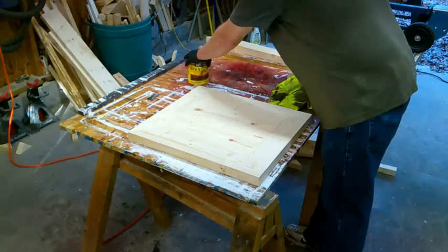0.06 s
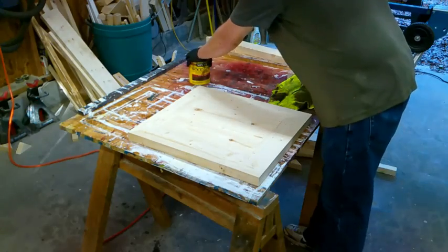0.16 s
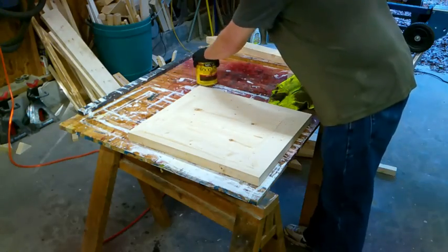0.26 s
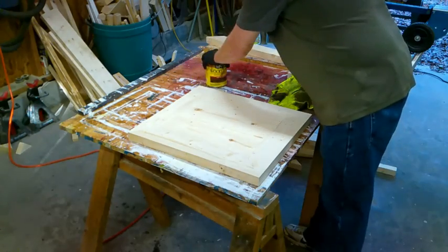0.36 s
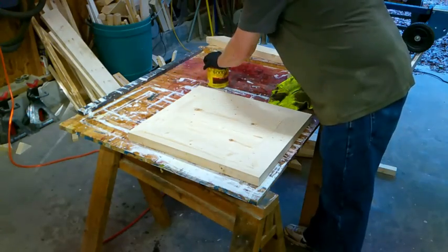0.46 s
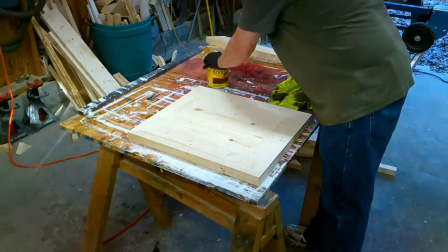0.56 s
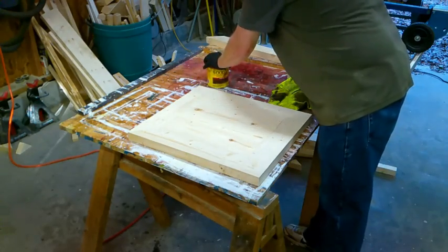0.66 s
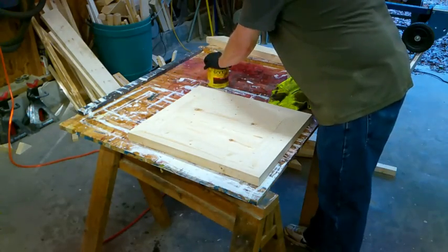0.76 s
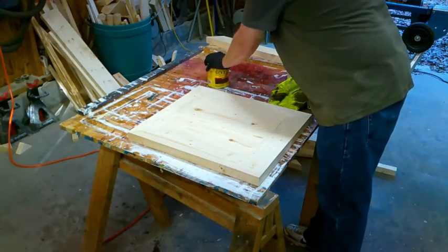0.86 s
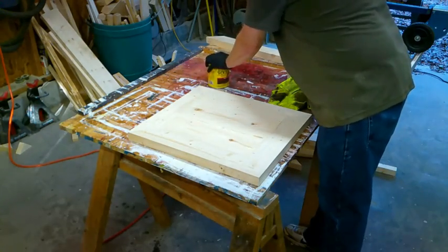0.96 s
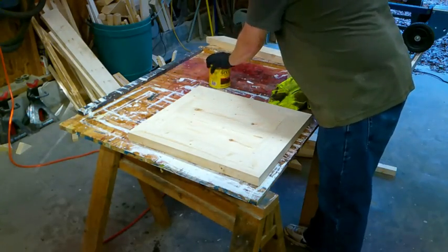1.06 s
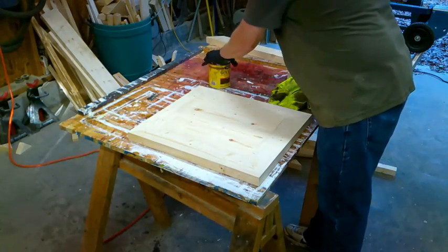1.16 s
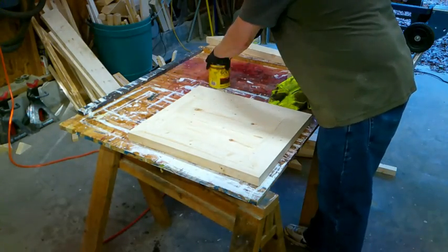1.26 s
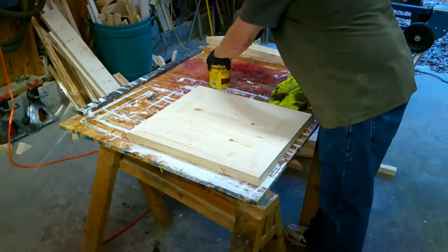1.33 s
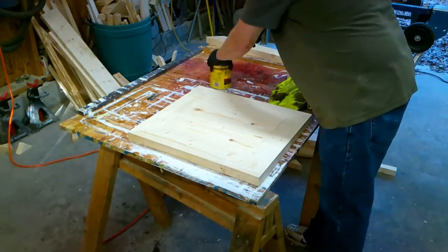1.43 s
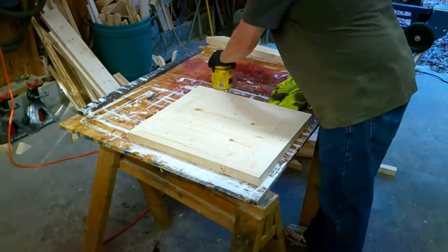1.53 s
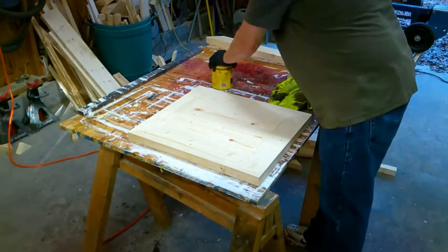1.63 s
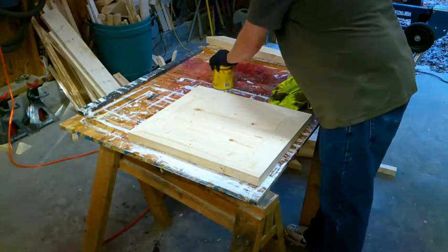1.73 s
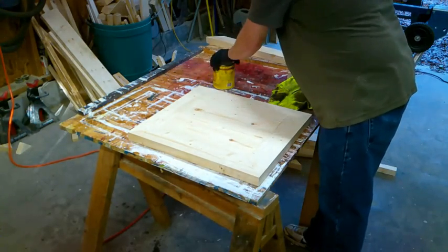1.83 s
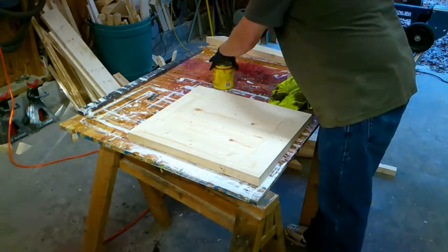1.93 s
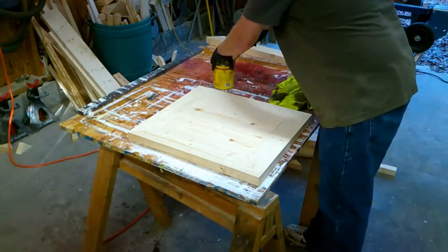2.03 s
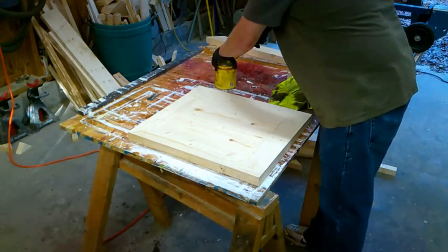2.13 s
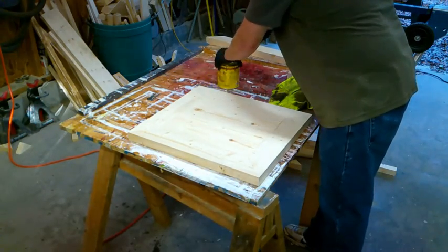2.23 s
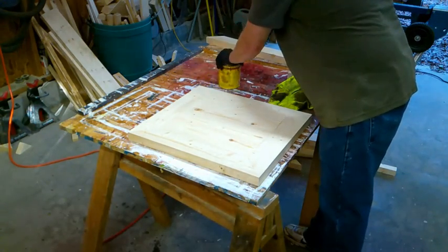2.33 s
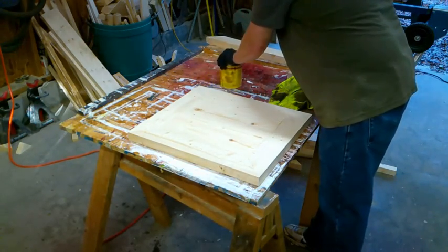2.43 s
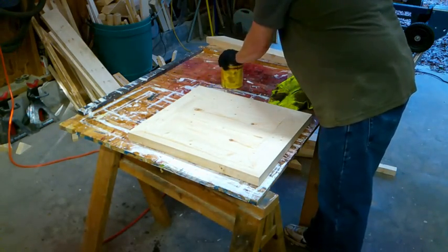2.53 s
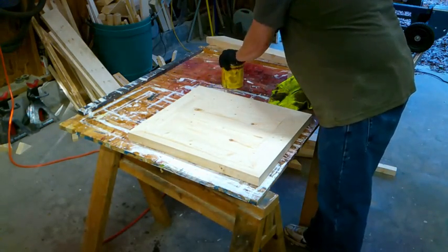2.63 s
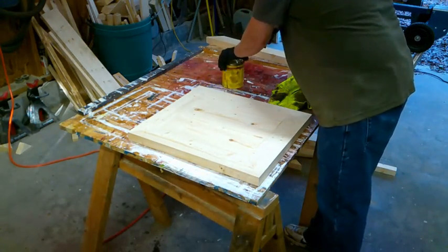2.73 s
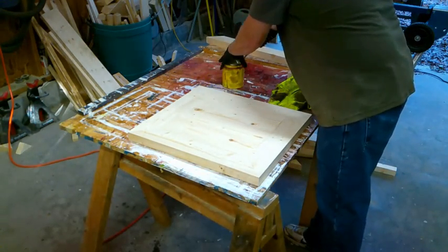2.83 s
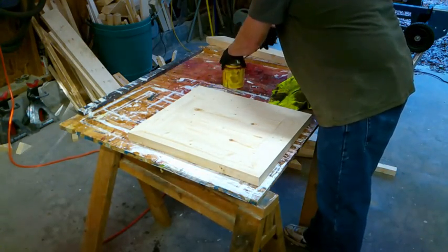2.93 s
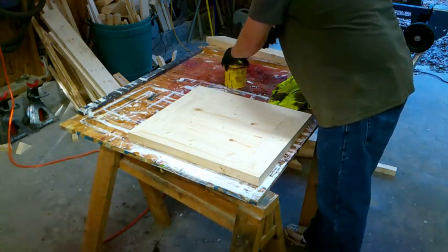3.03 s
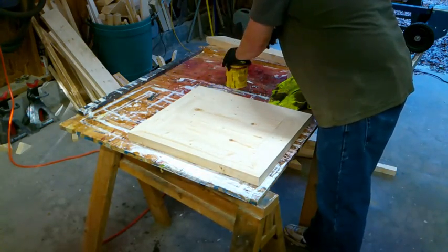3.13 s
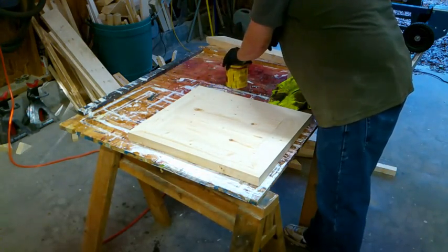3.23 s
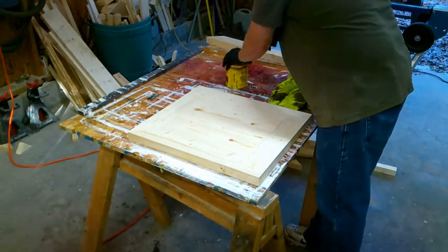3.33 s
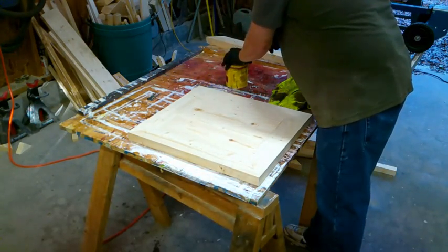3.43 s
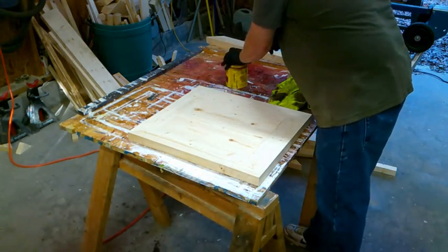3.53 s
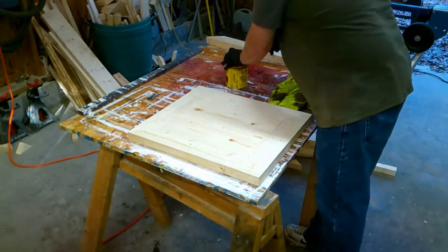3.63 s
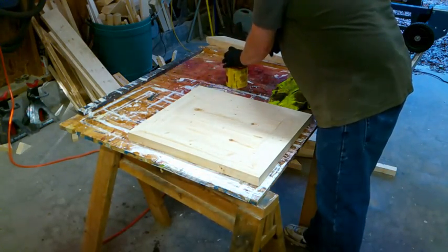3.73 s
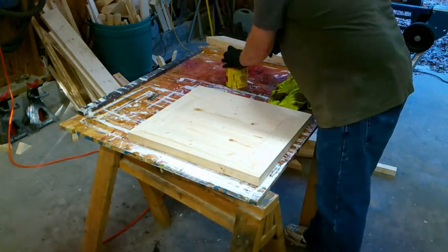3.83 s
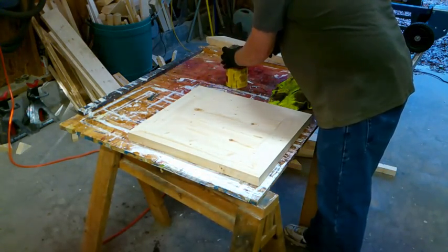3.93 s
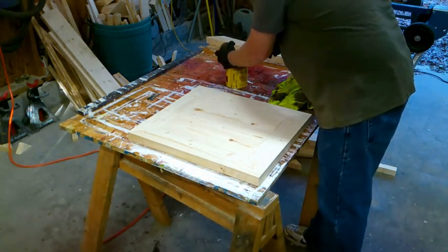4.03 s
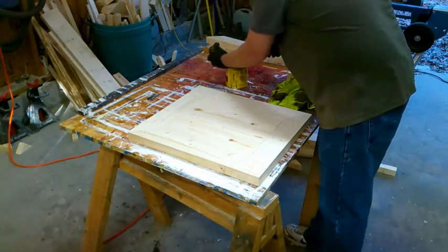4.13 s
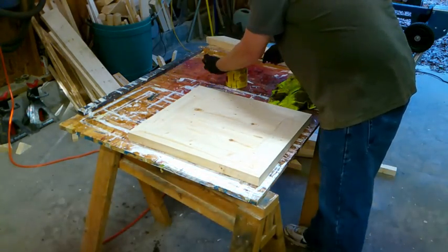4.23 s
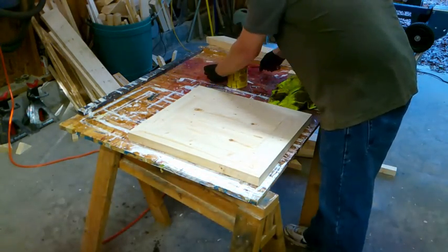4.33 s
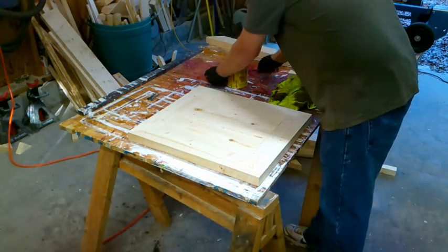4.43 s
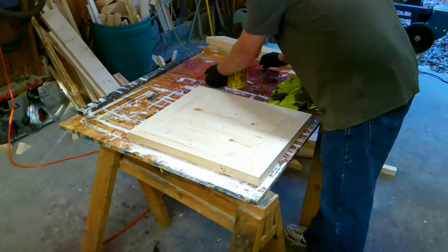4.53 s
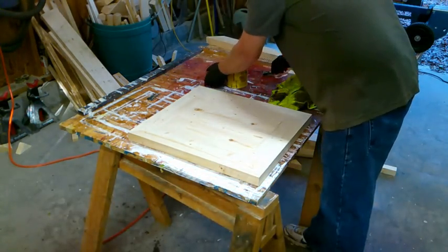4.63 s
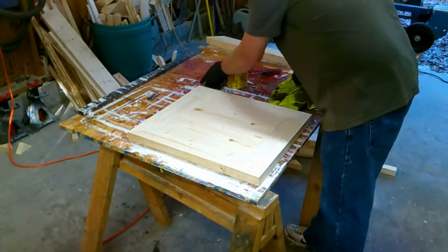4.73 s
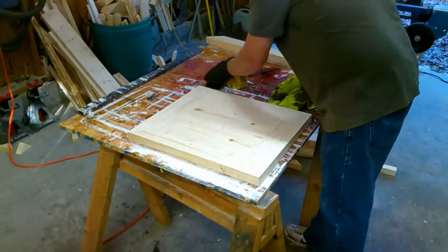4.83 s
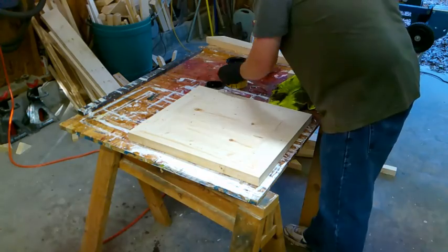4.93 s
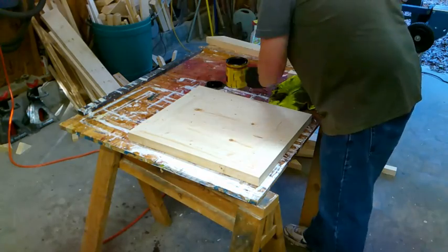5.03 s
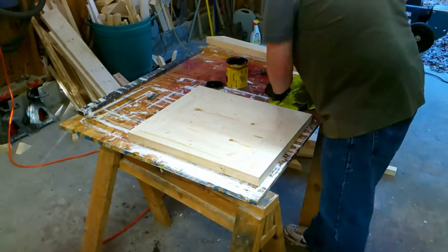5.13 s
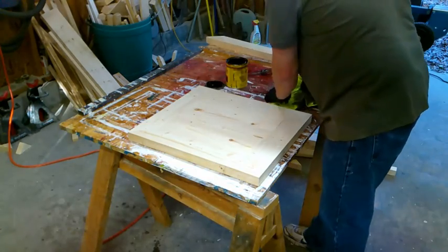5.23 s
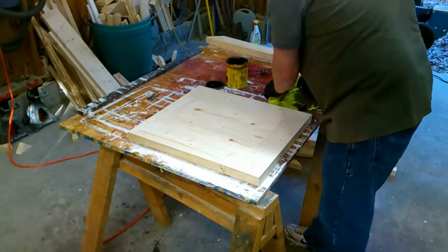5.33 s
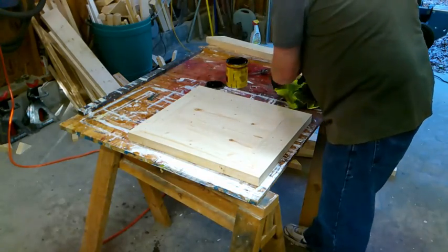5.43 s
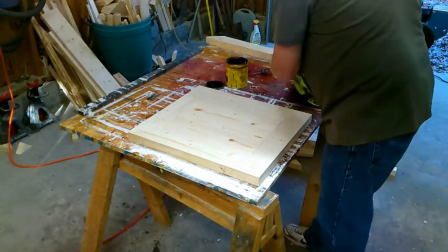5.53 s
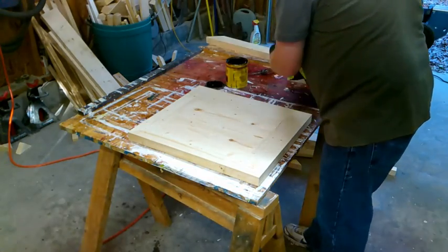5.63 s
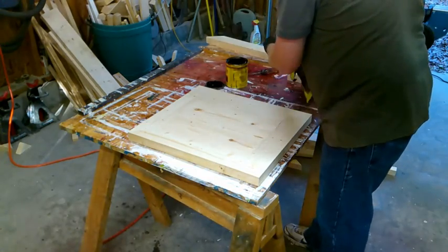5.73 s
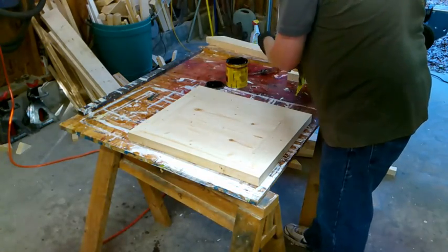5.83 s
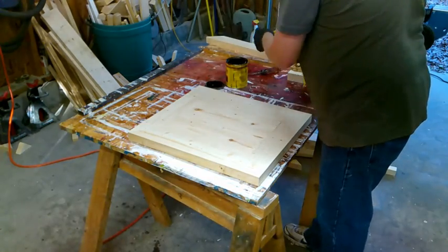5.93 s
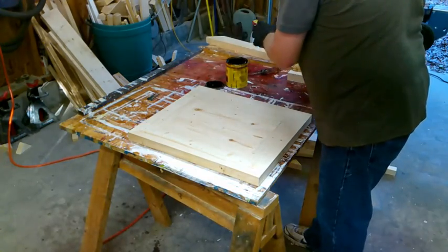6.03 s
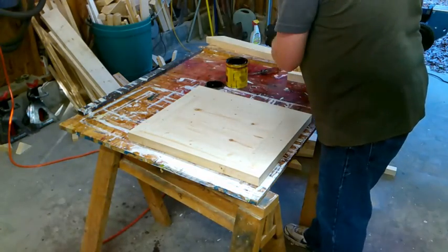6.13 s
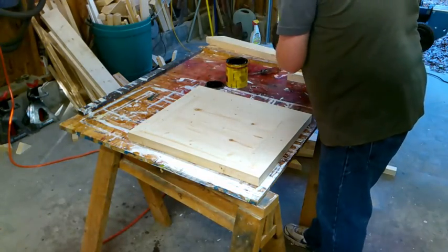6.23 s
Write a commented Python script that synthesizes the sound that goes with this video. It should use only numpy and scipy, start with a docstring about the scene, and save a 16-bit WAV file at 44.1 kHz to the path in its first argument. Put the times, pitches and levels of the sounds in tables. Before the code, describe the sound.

Light tinny knocks and gritty scrapes of a can on wood in a hard garage, ending with a dropped tool's loud clatter and short skid.

```python
"""Paint can opened on a workshop bench

A small paint can is turned, knocked and pried open on plywood; then a steel tool drops and skids.
Blows are bursts of contact noise that ring damped modes of bench, can and tool shaft.
Scuffs and the skid are dense grit noise, and little ticks are short bright bursts.
The hard garage answers for about half a second over mains hum and a faint hiss."""
import sys
import numpy as np
from scipy import signal
from scipy.fft import rfft, irfft
from scipy.io import wavfile
from scipy.ndimage import uniform_filter1d

SR = 44100
rng = np.random.default_rng(int(sys.argv[2]) if len(sys.argv) > 2 else 0)


def put_to_file(sound):
    """Save the sound as 16-bit audio at rate SR, in the file named by the first command-line argument."""
    columns = np.atleast_2d(sound).T  # one column per channel
    safe = np.clip(columns, -1, 1)
    whole_steps = np.round(safe * 32767)
    wavfile.write(sys.argv[1], SR, whole_steps.astype(np.int16))


N = 276066
T = np.arange(N) / SR  # seconds

# All levels stand ahead of the soft saturation in record().
# Mains hum partials. Each row: frequency in Hz, starting level in dB rms.
HUM_PARTIALS = [(59.6, -55), (119.5, -69.5), (179, -60), (300, -73.5)]
# Colour of the hiss. Each row: frequency in Hz, relative spectral level in dB.
HISS_COLOUR = [(24, -5.5), (40, -23), (77, -14.5), (114, -7.5), (179, -16), (230, -15.5), (710, -20),
               (12300, -35.5), (15800, -34.5)]
# Room decay by band. Each row: band in Hz, t60 in seconds, level in dB against the direct sound.
ROOM_BANDS = [(313, 0.63, -4.5), (857, 0.6, 1.5), (3190, 0.41, -2.5), (8640, 0.31, -3.5)]
# Damped bodies: t60 in seconds, then the modes. Each row: nominal frequency in Hz, relative level in dB.
BENCH_BODY = 0.11, [(150, -11.5), (185, -5.5), (232, -1), (298, 1), (340, -3), (377, -3), (435, -2.5),
              (468, -5), (520, -2.5), (617, -3.5), (690, -7.5)]  # plywood top
WALL_BODY = 0.033, [(770, 6.5), (925, 5.5), (1050, 4.5), (1200, -1), (1330, 7.5), (1490, 1), (1600, 0.5),
             (1840, 1)]  # side of the can, damped by glove and paint
RIM_BODY = 0.021, [(2310, 2), (2560, 8.5), (2840, 3.5), (3100, 4.5), (3380, 0.5), (4170, 5), (4300, -25),
            (4710, 3), (5100, -46), (5820, -1), (6720, -11), (8360, -10.5)]  # rim of the can
SHAFT_BODY = 0.044, [(1950, -20.5), (2280, 6.5), (2750, -12), (3350, -13.5), (4680, -21), (5700, -20.5),
              (6840, -22), (9800, -16.5)]  # shaft of the steel tool
# Bright little ticks of grit or glove. Each row: start in seconds, level in dB.
GRIT_TICKS = [(0.64, -43.5), (.888, -62), (3.386, -51.5), (2.419, -58), (3.514, -76), (5.158, -59),
              (5.205, -55)]
# Can and gloves rub the bench. Each row: middle in seconds, length in seconds, peak bench level in dB,
# peak metal level in dB.
BENCH_SCUFFS = [(0.293, 0.42, -34.5, -52), (0.36, 0.36, -39, -81), (0.71, 0.21, -53, -54),
                (0.923, 0.066, -34, -49), (1.083, 0.21, -38, -52.5), (1.315, 0.039, -35.5, -41),
                (1.878, 0.12, -44.5, -52), (2.074, 0.082, -39.5, -61), (2.437, 0.034, -53, -53),
                (2.522, 0.37, -37, -47.5), (2.754, 0.1, -40, -47), (3.31, 0.27, -36.5, -48),
                (3.775, 0.22, -44, -61), (3.892, 0.043, -44, -55), (4.232, 0.092, -62, -57.5),
                (4.386, 0.29, -58, -56.5)]
# The tool lands and bounces against bench and can. Each row: start in seconds, bench level in dB,
# can wall level in dB, favoured pitch in Hz, shaft level in dB.
TOOL_DROPS = [(4.411, -35, -18.5, 898, -37.5), (4.479, -25, -37.5, 770, -45), (4.503, -9, -26.5, 770, -31),
              (4.511, -46, -10.5, 1170, -54), (4.591, -19.5, -23.5, 1105, -52.5),
              (4.638, -12.5, -15, 770, -27), (4.673, -21, -26, 770, -35), (4.749, -15.5, -12.5, 808, -41),
              (4.829, -25, -22.5, 770, -56), (4.935, -21, -26.5, 1400, -61)]
# Blows on the can. Each row: start in seconds, bench level in dB, rim level in dB,
# favoured pitch in Hz, chatter decay in seconds.
CAN_KNOCKS = [(.01, -31.5, -37, 4260, 0.0069), (0.024, -33, -50, 1120, .01), (0.331, -26, -48, 752, 0.013),
              (.349, -24, -46.5, 920, 0.0065), (.428, -29, -52, 2380, 0.0042),
              (0.746, -35.5, -42, 1380, 0.034), (.889, -43, -48, 4330, 0.0043),
              (1.164, -21, -62.5, 784, 0.0052), (1.233, -44, -51.5, 2370, 0.062),
              (1.261, -28, -36, 2570, 0.0081), (1.386, -34, -52, 810, 0.0057),
              (1.513, -31.5, -39, 820, 0.0038), (1.52, -61, -26.5, 2610, 0.024),
              (1.534, -29.5, -39.5, 1270, 0.0087), (1.559, -26.5, -60, 1030, 0.0071),
              (1.63, -21, -56, 2260, 0.0051), (1.69, -46, -51.5, 2300, 0.032),
              (1.918, -39, -49.5, 2370, 0.029), (2.063, -41, -52.5, 814, 0.028),
              (2.188, -28.5, -38.5, 2740, 0.041), (2.227, -32, -31, 1340, 0.016),
              (2.276, -24.5, -40.5, 3440, 0.0057), (2.298, -32, -35, 2360, 0.012),
              (2.459, -30, -34, 1326, .015), (2.565, -46, -42.5, 3860, 0.004),
              (2.788, -31.5, -46, 3940, 0.0033), (2.87, -31.5, -49.5, 2700, 0.023),
              (3.026, -22.5, -30, 2640, 0.019), (3.072, -41.5, -30.5, 1406, 0.0015),
              (3.263, -31, -37, 1330, 0.011), (3.379, -51, -47.5, 767, 0.0093),
              (3.563, -37, -67.5, 734, 0.0081), (3.843, -40, -55, 4400, 0.012),
              (3.976, -38.5, -64, 720, 0.0026)]

HUM_RISE_DB_PER_S, HISS_DB = 0.9, -52
SKID_S, SKID_HOLD_S, SKID_FADE_DB_PER_S = 4.765, 0.2, 148
SKID_BENCH_DB, SKID_METAL_DB = -24.5, -40
DROP_CHATTER_S = 0.0066
# the can's wall sits midway between bench and rim, louder when the favoured pitch is low
WALL_DB, WALL_STRUCK_DB, WALL_TOP_HZ = -2, 7.5, 1950
TOP_HZ = 15830  # upper edge of the output


def undb(db):
    """Turn decibels into an amplitude factor."""
    return 10 ** (np.asarray(db) / 20)


def unit(x):
    """Scale to rms 1."""
    return x / np.sqrt(np.mean(x ** 2))


def band(x, lo_hz, hi_hz):
    """Butterworth band-pass."""
    return signal.sosfilt(signal.butter(3, [lo_hz, hi_hz], "band", fs=SR, output="sos"), x)


def background():
    """Mains hum with a slight waver and a slow rise, over a broad hiss."""
    steps = np.repeat(rng.standard_normal(N // 4000 + 1), 4000)[:N]
    waver_db = 0.78 * uniform_filter1d(steps, 4000)
    hum = sum(np.sqrt(2) * undb(db + waver_db) * np.sin(2 * np.pi * hz * T) for hz, db in HUM_PARTIALS)
    hz, db = np.transpose(HISS_COLOUR)
    f = np.maximum(np.arange(N // 2 + 1) * SR / N, 1)
    colour = undb(np.interp(np.log(f), np.log(hz), db))
    hiss = unit(irfft(rfft(rng.standard_normal(N)) * colour, N))
    return hum * undb(HUM_RISE_DB_PER_S * T) + hiss * undb(HISS_DB)


def room(x):
    """Dense echoes from concrete and clutter, fading band by band; they are drawn afresh every 0.2 s."""
    t = T[:SR]
    rise = 1 - np.exp(-t / 0.0063)  # the first walls are a few metres off
    step = SR // 5
    out = np.zeros(N + 2 * SR)
    for at in range(0, N, step):
        tail = 0
        for hz, t60, db in ROOM_BANDS:
            fade = np.exp(-np.log(1000) * t / t60)
            echoes = band(rng.standard_normal(SR), hz / 2.26, hz * 1.536) * rise * fade
            # one-second tail, so FFT bins are 1 Hz apart
            power = np.abs(rfft(echoes))[int(hz / 1.4):int(hz * 1.4)] ** 2
            tail = tail + echoes * undb(db) / np.sqrt(np.mean(power))
        answer = signal.fftconvolve(x[at:at + step], tail)
        out[at:at + len(answer)] += answer
    return x + out[:N]


def grit(size, grain_db):
    """Dense contacts of very uneven strength, bunched about 3 ms at a time."""
    bunch = np.repeat(rng.standard_normal(size // 128 + 1), 128)[:size]
    return rng.standard_normal(size) * undb(grain_db * bunch)


def ring(body, push, lean_hz=None, narrow=0.037, scatter_db=2.5):
    """A body driven by a chatter of contacts; the spot that is struck favours the modes near lean_hz."""
    t60, modes = body
    hz, db = np.tile(np.transpose(modes), 2)  # dents and grip split every mode into a close pair
    detune, scatter = rng.standard_normal((2, len(hz)))
    hz = hz * (1 + 0.02 * detune)
    if lean_hz:
        db = db - 8 * (1 - np.exp(-(np.log(hz / lean_hz) / narrow) ** 2))
    # the spot sets how strongly a mode answers, whatever the timing of the contacts
    power = uniform_filter1d(np.abs(rfft(push)) ** 2, size=7)
    reach = np.sqrt(power[(hz * len(push) / SR).astype(int)])
    t = T[:int(t60 * SR), None]
    waves = np.sin(2 * np.pi * hz * t) * np.exp(-np.log(1000) * t / t60)
    sides = (-1.) ** np.tile(np.arange(len(modes)), 2)  # neighbouring modes swing in opposite senses
    strength = sides * undb(db + scatter_db * scatter) / reach
    return signal.fftconvolve(push, waves @ strength)


def slide(low, high, note_hz, sing, grain_db):
    """Rubbing: grit under the moving metal clicks densely into the bench and rasps around one metal note."""
    rub, rasp, hiss = (grit(N, grain_db) for _ in range(3))
    tap = np.r_[1., np.zeros(SR // 10)]
    bench = signal.fftconvolve(rub, ring(BENCH_BODY, tap))[:N]
    wood = unit(bench) + 0.48 * unit(band(rub, 590, 2900))
    note = unit(band(hiss, .985 * note_hz, 1.015 * note_hz))
    metal = sing * note + unit(band(rasp, 2500, 6300)) + .3 * unit(band(hiss, 6000, 15000))
    return wood * low + metal * high


def ticks():
    """Each tick is a bright snap of a few ms."""
    out, t = np.zeros(N), T[:SR // 50]
    for s, db in GRIT_TICKS:
        snap = band(rng.standard_normal(len(t)) * np.exp(-t / 0.0038), 2600, 8900)
        at = int(s * SR)
        out[at:at + len(t)] += undb(db) * unit(snap)
    return out


def scuffs():
    """Each scuff swells and fades smoothly as the hand pushes and lets go."""
    low, high = 0, 0
    for s, length, bench_db, metal_db in BENCH_SCUFFS:
        push = np.cos(np.pi * np.clip((T - s) / length, -.5, .5)) ** 2
        low = low + undb(bench_db) * push
        high = high + undb(metal_db) * push
    return slide(low, high, note_hz=2700, sing=0.166, grain_db=5.0)


def skid():
    """The tool slides steadily, then fades to a stop; its shaft sings a thin high note."""
    fade_s = np.maximum(T - SKID_S - SKID_HOLD_S, 0)
    swell = (T > SKID_S) * undb(-SKID_FADE_DB_PER_S * fade_s)
    low, high = swell * undb(SKID_BENCH_DB), swell * undb(SKID_METAL_DB)
    return slide(low, high, note_hz=6850, sing=.3, grain_db=2.2)


def blows(rows, high_body, bench_hz, rasp_db, high_rasp_db, tick_db, spot_db):
    """Each blow is a chatter of contacts that builds and dies away, ringing bench and metal."""
    out = np.zeros(N + SR)
    head = SR // 50  # each layer's level is its rms over the first 20 ms
    t = T[:SR // 6]
    for s, low, wall, high, hz, chatter in rows:
        swell = (1 - np.exp(-t / (0.17 * chatter))) * np.exp(-t / chatter)
        push, rasp, tick = (grit(len(t), 3.16) * swell for _ in range(3))
        spot = wall if hz < WALL_TOP_HZ else high
        layers = [(ring(BENCH_BODY, push, bench_hz, narrow=0.42), low),
                  (band(ring(WALL_BODY, push, hz), 285, 2300), wall),
                  (ring(high_body, push, hz), high),
                  # bare contact noise between the modes, with a band around the favoured pitch
                  (band(tick, 340, 2140), wall + rasp_db),
                  (band(rasp, 1200, 5680), high + high_rasp_db),
                  (band(tick, 5220, 11000), high + tick_db),
                  (band(push, hz / 1.181, hz * 1.162), spot + spot_db)]
        at = int(s * SR)
        for x, db in layers:
            out[at:at + len(x)] += x * undb(db) / np.sqrt(np.mean(x[:head] ** 2))
    return out[:N]


def tool():
    """The dropped tool rings bench, can wall and its own shaft."""
    rows = [(s, low, wall, shaft, hz, DROP_CHATTER_S) for s, low, wall, hz, shaft in TOOL_DROPS]
    return blows(rows, SHAFT_BODY, bench_hz=370, rasp_db=-1.5, high_rasp_db=-5.0, tick_db=-14, spot_db=-2.0)


def can():
    """Knocks on the can ring bench, wall and rim."""
    rows = []
    for s, low, rim, hz, chatter in CAN_KNOCKS:
        wall = (low + rim) / 2 + WALL_DB + WALL_STRUCK_DB * (hz < WALL_TOP_HZ)
        rows.append((s, low, wall, rim, hz, chatter))
    return blows(rows, RIM_BODY, bench_hz=329, rasp_db=-5.5, high_rasp_db=0, tick_db=-8, spot_db=1)


def scene():
    """Sources and ticks sound in the room; hum and hiss lie underneath."""
    # the bench top is too small to radiate deep bass
    near = band(can() + tool() + scuffs() + skid(), 118.5, 19300)
    return (room(near + ticks()) + background())[None]


def record(dry):
    """Soft saturation rounds the loudest peaks and a steep low-pass cuts the top."""
    rounded = np.tanh(1.06 * dry) / 1.22
    return signal.sosfilt(signal.ellip(10, .2, 80, TOP_HZ, fs=SR, output="sos"), rounded)


dry = scene()
out = record(dry)
put_to_file(out)
```